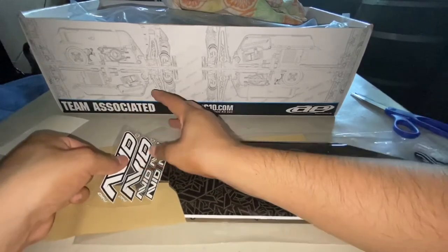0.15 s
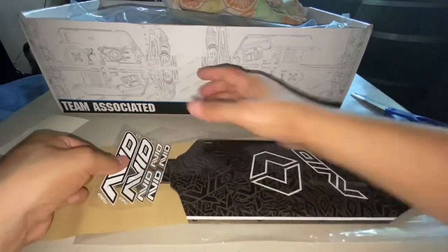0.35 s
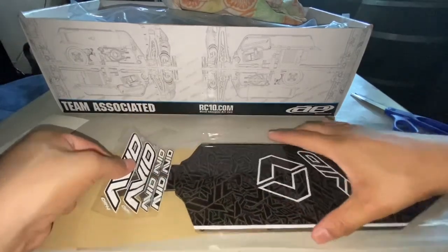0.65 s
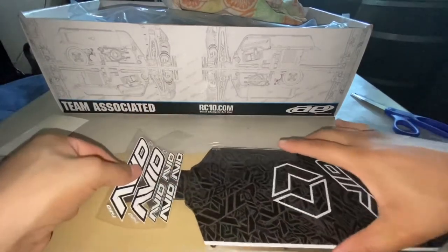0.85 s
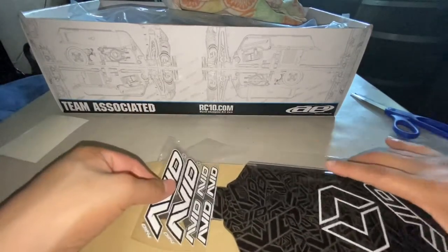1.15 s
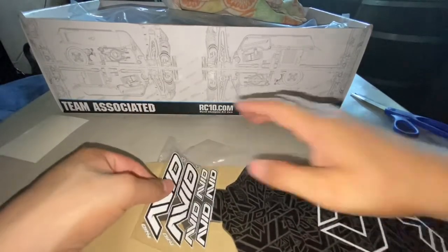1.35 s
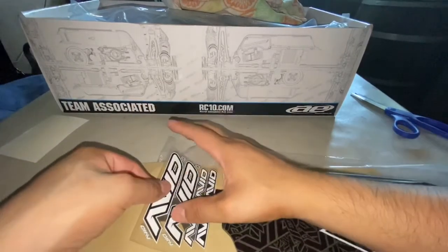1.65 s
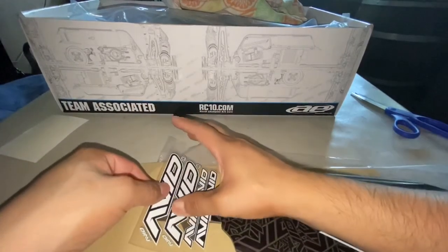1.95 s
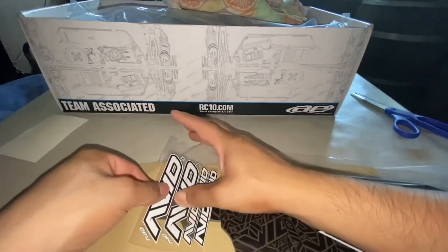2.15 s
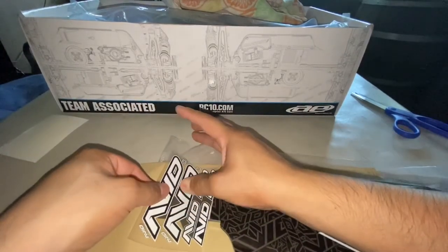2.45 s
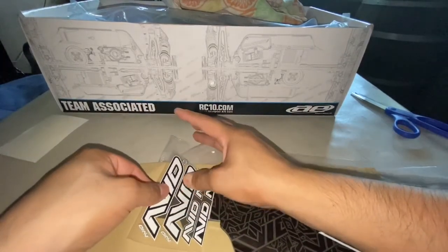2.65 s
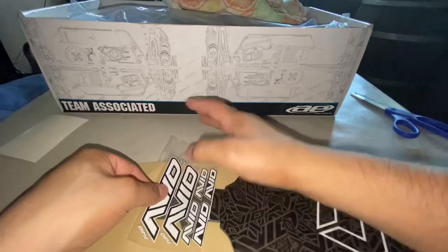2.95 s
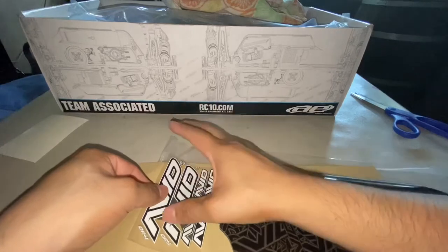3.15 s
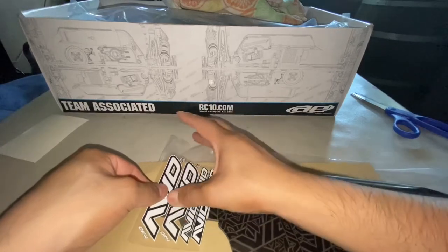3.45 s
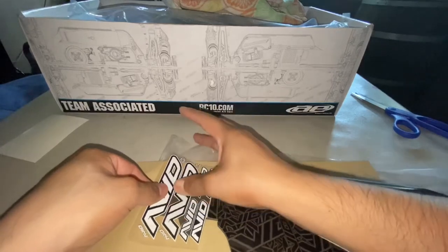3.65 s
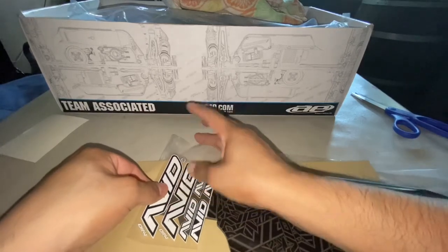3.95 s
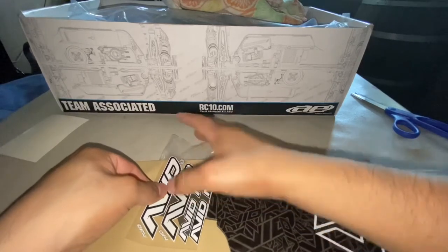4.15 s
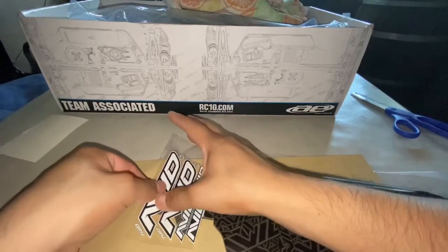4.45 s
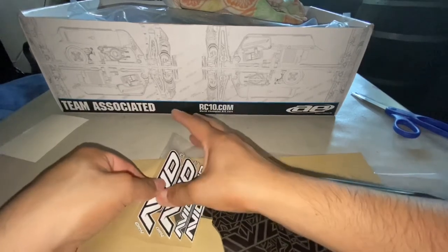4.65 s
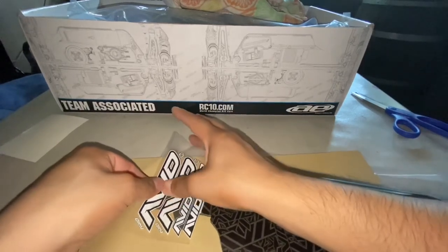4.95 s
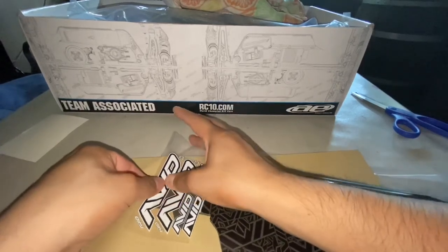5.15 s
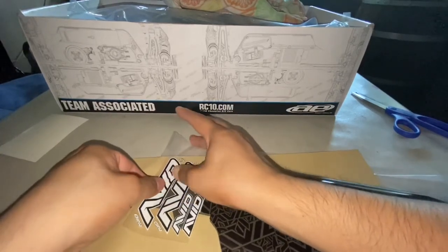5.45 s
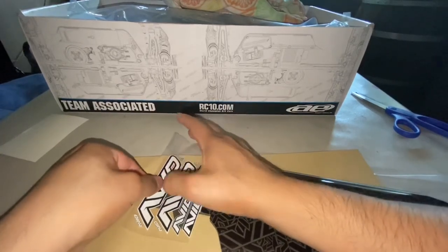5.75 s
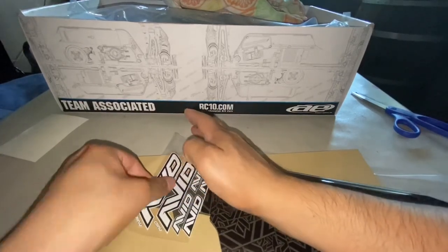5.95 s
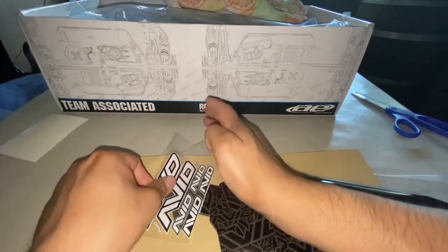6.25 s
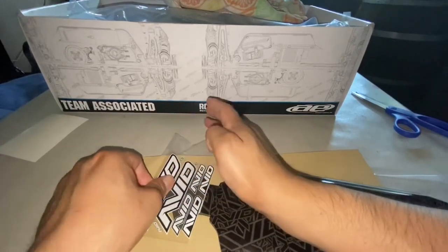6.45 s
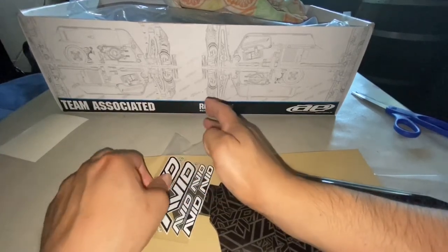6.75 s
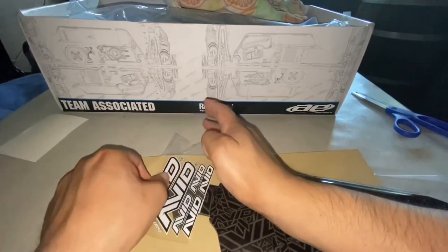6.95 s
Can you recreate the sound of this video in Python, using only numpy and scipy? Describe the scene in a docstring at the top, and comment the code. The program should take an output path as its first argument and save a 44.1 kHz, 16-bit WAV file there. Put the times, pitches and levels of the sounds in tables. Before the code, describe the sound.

Close, quiet handling of plastic film and backing paper: sliding, tiny clicks, sparse crackles, a strong mid-way table thud, low room hum.

```python
"""Hands press and slide a sheet of stickers over backing paper and a thin plate on a hollow table.
Film and paper crinkle: puffs of tiny snaps excite film, plate and sizzle responses; pressing mostly rings the plate.
Sliding is steadier snaps, squeaks and one bright snap are short noise bursts, dragging is noise through table modes.
The heel of a hand thumps the table (decaying sines); a machine hums and whines in the room (filtered noise, a sine).
A stereo microphone is close by."""
import sys
import numpy as np
from scipy import signal
from scipy.fft import rfft, irfft
from scipy.io import wavfile

SR = 44100
rng = np.random.default_rng(int(sys.argv[2]) if len(sys.argv) > 2 else 0)


def inscribe(sig):
    """Save sig as 16-bit PCM at rate SR to the path in sys.argv[1].

    A 1-D sig is mono; a 2-D sig holds one channel per row.
    Samples are clipped to [-1, 1] before scaling.
    """
    pcm = np.round(np.clip(np.atleast_2d(sig).T, -1, 1) * 32767)
    wavfile.write(sys.argv[1], SR, pcm.astype(np.int16))


def amplitude_ratio(level_db):
    """Convert a level in decibels to the matching linear amplitude (field) ratio."""
    exponent = np.asarray(level_db, float) / 20
    return 10 ** exponent


N = 313551

TIME_S = np.arange(N) / SR
GRID_HZ = np.maximum(np.arange(N // 2 + 1) * SR / N, 1)
PUFF_N = 16384   # samples in the window of one short event, peak in the middle
PUFF_LATE_S = (np.arange(PUFF_N) - PUFF_N // 2) / SR
PUFF_GRID_HZ = np.maximum(np.arange(PUFF_N // 2 + 1) * SR / PUFF_N, 1)
RISE_SHARE = 0.85   # rise time over fall time
SNAP_SPREAD_DB = 2.5
BOX_HZ = 240   # table modes above this belong to the box, the others to the top


def at_hz(points, hz=GRID_HZ):
    """Read a table on a log-frequency axis."""
    point_hz, value = np.transpose(points)
    return np.interp(np.log(hz), np.log(point_hz), value)


def noise():
    """Two unrelated white noises."""
    return rng.standard_normal((2, N))


def coloured(x, gain):
    """Filter by a gain per frequency and bring to rms 1."""
    y = irfft(rfft(x) * gain, N)
    return y / np.sqrt(np.mean(y ** 2))


def unit(gain):
    """Scale a response so that it keeps the power of white noise."""
    return gain / np.sqrt(np.mean(np.abs(gain) ** 2))


def resonance(hz, width_hz, grid_hz=GRID_HZ):
    """Response of one damped resonator, 1 at its peak."""
    return 1 / (1 + 1j * (grid_hz ** 2 - hz ** 2) / (grid_hz * width_hz))


def sides(left_over_right_db):
    """Left and right gains."""
    return amplitude_ratio(np.multiply.outer([0.5, -0.5], left_over_right_db))


def grains(per_s, spread_db):
    """Two unrelated trains of dense tiny snaps with uneven sizes."""
    born = rng.random((2, N)) < per_s / SR
    sizes = amplitude_ratio(spread_db * np.minimum(rng.exponential(1, (2, N)), 4))
    return born * sizes * noise()


def swell(late_s, fall_s, rise_share, point=2):
    """Envelope 1 at its peak, 1/e at fall_s; rises faster than it dies; a small point makes a sharp tip."""
    even_s = np.where(late_s < 0, late_s / rise_share, late_s)
    return np.exp(-np.abs(even_s / fall_s) ** point)


# share of the left sound in the right port: hz, share
PORT_LIKENESS = [(60, 0.96), (300, 0.64), (700, 0.66), (3000, 0.19), (9000, 0.25), (10600, 1),
                 (15000, 0.62)]
# phase by which the right port leads: hz, half_turns
PORT_LEAD = [(300, 0), (480, .45), (800, .8), (2000, .3), (4500, 0), (5800, 1), (8200, 3), (9300, 5),
             (10500, 6), (11800, 6), (12700, 7), (13900, 7), (14500, 8)]


def ports(pair):
    """Two microphone ports: the right hears the first sound with turned phase, mixed with the second sound."""
    alike = np.clip(at_hz(PORT_LIKENESS), 0, 1)
    first, second = rfft(pair)
    turned = first * np.exp(1j * np.pi * at_hz(PORT_LEAD))
    right = alike * turned + np.sqrt(1 - alike ** 2) * second
    return np.array([pair[0], irfft(right, N)])


# spectrum of the room air: hz, relative_db
ROOM_SPECTRUM = [(15, -12), (28, -18), (45, 0), (123, -5.5), (150, -10), (228, -13), (268, -14.5),
                 (324, -17.5), (556, -28), (728, -32.5), (1060, -35.5), (1210, -37.5), (1680, -66),
                 (5000, -49), (12000, -58), (14000, -56), (15800, -95)]
# hum lines of the machine: pitch_hz, level_db, width_hz (of each of two equal resonances)
HUM_LINES = [(58.36, -74, 3), (118.3, -65.5, 1.95), (170.8, -70, 3.9), (221.5, -73.5, 8.6)]


def room():
    """Steady air noise and the wavering lines of a distant machine, noise through narrow resonances."""
    out = amplitude_ratio(-60) * coloured(noise(), amplitude_ratio(at_hz(ROOM_SPECTRUM)))
    for pitch_hz, level_db, width_hz in HUM_LINES:
        out += amplitude_ratio(level_db) * coloured(noise(), resonance(pitch_hz, width_hz) ** 2)
    return out


def whine():
    """A faint tone from the machine's motor: a steady sine plus narrow noise that wavers in strength."""
    pitch_hz, waver_hz, steady_db, waver_db = 1180, 9, -92.94, -87.94
    steady = np.sqrt(2) * np.sin(2 * np.pi * pitch_hz * TIME_S + rng.uniform(0, 2 * np.pi))
    waver = coloured(noise(), resonance(pitch_hz, waver_hz))
    return amplitude_ratio(steady_db) * steady + amplitude_ratio(waver_db) * waver


# table modes, the first is the boom: pitch_hz, level_db, t60_s (at ring_share 1)
TABLE_MODES = [(61.4, -3, 0.28), (76.7, 3, 0.059), (99.4, 6, 0.082), (128.4, 2, 0.057), (160.8, -8, 0.098),
               (216, -10, 0.053), (270, -10, 0.11), (310.7, 1, 0.06), (340.5, -0.5, 0.068),
               (412.4, -6, 0.045), (447, -3.5, 0.057), (586, -8, 0.041), (748, -16.5, 0.086),
               (722, -13.5, 0.012)]
# hand on the table: start_s, level_db, boom_db, box_db (both relative), ring_share (scales the t60)
HAND_THUMPS = [(.005, -34, -6.5, -2.5, 1.03), (.238, -31, -12, -14, 2.2), (1.157, -25, -6, -7, 1.95),
               (2.68, -37, 5, -8, 0.71), (2.806, -44, -12, -12, 2.2), (2.821, -18.5, -7.5, -6, 1.25),
               (3.033, -45, 2, -7.5, 1.27), (3.887, -52, 20.5, 11.5, 0.41), (4.043, -29, -24, 15.5, 1.92),
               (4.059, -5.5, -8.5, -11.5, 0.71), (4.188, -31.5, -5, -5.5, 1.03),
               (4.279, -59.5, 23.5, -16, 0.76), (4.391, -41, 11.5, 2, 0.28), (5.468, -39, 4.5, -30, 0.39),
               (5.664, -30, -6, 0.5, 0.23), (6.526, -49, -10, 6.5, 1.02)]


def thumps():
    """Each table mode builds up over some ms, then dies; some thumps ring longer, some shorter."""
    build_s, top_pan_db = 0.0047, 4.5   # the table top sounds more to the left
    out = np.zeros((2, N + SR))
    t = np.arange(SR // 2) / SR
    growth = (1 - np.exp(-t / build_s)) ** 2
    for start_s, level_db, boom_db, box_db, ring_share in HAND_THUMPS:
        first = int(start_s * SR)
        for k, (pitch_hz, mode_db, t60_s) in enumerate(TABLE_MODES):
            share_db = boom_db if k == 0 else box_db if pitch_hz > BOX_HZ else 0
            decay_db = -60 * t / (t60_s * ring_share)
            envelope = growth * amplitude_ratio(level_db + share_db + mode_db + decay_db)
            phase = np.pi * at_hz(PORT_LEAD, pitch_hz) * np.array([[-0.5], [0.5]])   # at the two ports
            pan = sides(top_pan_db * (pitch_hz < BOX_HZ))[:, None]
            out[:, first:first + len(t)] += pan * envelope * np.sin(2 * np.pi * pitch_hz * t + phase)
    return out[:, :N]


# plate dragged over the table: peak_s, level_db, box_db (relative), fall_s
PLATE_DRAGS = [(0.21, -60, 0.5, 0.14), (0.337, -63, -15, 0.036), (0.476, -60, -20, 0.079),
               (0.588, -55, -0.5, 0.045), (0.772, -57.5, 1.5, 0.049), (0.897, -52.5, -2, 0.044),
               (0.965, -45.5, -21, 0.032), (1.09, -60.5, -25, 0.11), (2.832, -35.5, -7, 0.029),
               (3.315, -59.5, -5.5, 0.11), (4.043, -36.5, -9.5, 0.013), (4.067, -34.5, 3, 0.03),
               (5.914, -76, 7.5, 0.11), (6.226, -58.5, 2.5, 0.044), (6.362, -60, -3.5, 0.1)]


def drags():
    """Friction noise keeps the table modes rumbling while the plate slides; top and box are fed apart."""
    out = 0
    for box in (False, True):
        table = sum(amplitude_ratio(mode_db) * resonance(pitch_hz, 2.44 / t60_s) * (-1) ** k
                    for k, (pitch_hz, mode_db, t60_s) in enumerate(TABLE_MODES)
                    if (pitch_hz > BOX_HZ) == box)
        push = sum(amplitude_ratio(level_db + box * box_db) * swell(TIME_S - peak_s, fall_s, 0.94)
                   for peak_s, level_db, box_db, fall_s in PLATE_DRAGS)
        out = out + push * coloured(noise(), table)
    return out


# plate resonances: pitch_hz, width_hz, level_db
PLATE_MODES = [(452, 80, -3), (640, 120, -13), (883, 20, 3), (1020, 50, -4), (1290, 70, 0), (1710, 60, -10),
               (1980, 64, -7), (2470, 70, -14), (2930, 120, -21), (3300, 120, -19), (5350, 70, -22)]


def plate(grid_hz, uneven_db):
    """Sum of the plate's resonances, strengths scattered by uneven_db; neighbours swing opposite."""
    chance = rng.normal(0, 1, len(PLATE_MODES))
    return sum(amplitude_ratio(level_db + uneven_db * chance[k]) * resonance(pitch_hz, width_hz, grid_hz) * (-1) ** k
               for k, (pitch_hz, width_hz, level_db) in enumerate(PLATE_MODES))


# spectrum of the film, also for the crinkles: hz, relative_db
FILM_SPECTRUM = [(500, -70.5), (1100, 3.5), (2200, 4), (4000, -2), (7000, -4), (10000, -23), (14000, -57)]
# spectrum of the finest sizzle, also for the crinkles: hz, relative_db
SIZZLE_SPECTRUM = [(3500, -80.5), (5500, -14.5), (7500, -5), (9400, -5.5), (10600, -4), (12000, -6.5),
                   (13300, -8), (14800, -12), (15800, -7.5)]
# sheet sliding over the paper, course of the drive: time_s, drive_db
SHEET_RUBBING = [(0, -61.5), (.12, -95), (.24, -63), (.97, -62.5), (1.23, -78.5), (1.8, -82.5), (2, -75),
                 (2.2, -80.5), (3.1, -78.5), (3.4, -82.5), (4.47, -74), (4.9, -79.5), (5.13, -76),
                 (5.35, -81), (5.55, -70), (5.85, -81), (6.48, -82.5), (6.7, -76.5), (7.11, -78.5)]
# skin creeping slowly over the plate: peak_s, level_db, fall_s
SKIN_CREEPS = [(0.245, -62, 0.076), (0.55, -67, 0.057), (.79, -63.5, 0.076), (1.07, -70, 0.12),
               (1.895, -65, 0.078), (2.138, -68, 0.11), (2.866, -72, 0.061), (3.245, -64, .06),
               (3.388, -73, 0.029), (4.117, -67, 0.068), (4.467, -74, 0.16), (5.27, -65.5, 0.047),
               (5.904, -67.5, 0.11), (6.032, -64, 0.13), (6.353, -73, 0.089)]


def rubbing():
    """Sliding feeds film and sizzle with dense snaps; soft skin feeds mostly the plate's low modes, sparser."""
    drive = amplitude_ratio(np.interp(TIME_S, *np.transpose(SHEET_RUBBING)))
    film = amplitude_ratio(-7) * coloured(grains(9000, SNAP_SPREAD_DB), amplitude_ratio(at_hz(FILM_SPECTRUM)))
    sizzle = amplitude_ratio(-10.5) * coloured(grains(14000, 1.2), amplitude_ratio(at_hz(SIZZLE_SPECTRUM)))
    coarse_s = TIME_S[::SR // 1000]   # about 1 ms steps
    creep = sum(amplitude_ratio(level_db) * swell(coarse_s - peak_s, fall_s, RISE_SHARE)
                for peak_s, level_db, fall_s in SKIN_CREEPS)
    soft = 1 / (1 + (GRID_HZ / 1200) ** 2)
    hollow = coloured(grains(3000, 6.2), plate(GRID_HZ, uneven_db=0) * soft)
    return drive * (film + sizzle) + np.interp(TIME_S, coarse_s, creep) * hollow


# squeaks and one bright snap: peak_s, pitch_hz, level_db, fall_s, width_hz (of each of two equal resonances)
SQUEAK_BURSTS = [(0.452, 2097, -65, 0.016, 90), (0.533, 2016, -60, 0.049, 120),
                 (0.763, 1710, -54, 0.034, 500), (1.154, 2940, -62, .015, 120),
                 (2.756, 2000, -64, 0.038, 110), (3.3, 4730, -64.5, 0.018, 705),
                 (3.384, 886, -66.5, 0.025, 24.55), (4.013, 1980, -60, 0.035, 90),
                 (4.058, 2870, -39.5, 0.013, 300), (4.066, 2000, -42.5, 0.015, 200),
                 (4.478, 3510, -57, 0.019, 51), (6.225, 10300, -42.5, 0.0073, 2500),
                 (6.232, 3100, -53, 0.0091, 250), (6.227, 785, -50, 0.02, 70), (6.228, 428, -52, 0.015, 60)]


def squeaks():
    """Squeaks and one bright snap: short bursts around a pitch, noise twice through a resonance."""
    out = np.zeros((2, N + PUFF_N))
    for peak_s, pitch_hz, level_db, fall_s, width_hz in SQUEAK_BURSTS:
        first = int(peak_s * SR)
        response = unit(resonance(pitch_hz, width_hz, PUFF_GRID_HZ) ** 2)
        tone = irfft(rfft(rng.standard_normal((2, PUFF_N))) * response, PUFF_N)
        envelope = amplitude_ratio(level_db) * swell(PUFF_LATE_S, fall_s, 0.71, point=1.9)
        out[:, first:first + PUFF_N] += envelope * tone
    return out[:, PUFF_N // 2:PUFF_N // 2 + N]


# film crinkling: peak_s, film_db, pitch_hz, sizzle_over_film_db, fall_s
FILM_CRINKLES = [(0.075, -74, 4940, 5, 0.025), (0.151, -66.5, 3150, -3, 0.036),
                 (0.202, -62, 4900, 1.5, 0.029), (.33, -56.5, 3180, -6, 0.031),
                 (0.506, -70, 2800, -24, 0.016), (0.534, -57, 3140, -3.5, 0.03),
                 (0.585, -59.5, 3600, 2.5, 0.039), (.66, -60.5, 4670, 0.2, 0.016),
                 (0.754, -57, 2700, -28, 0.018), (0.837, -62, 3100, -6.5, 0.037),
                 (.915, -68.5, 4570, 6.5, 0.071), (1.153, -64.5, 2340, -6, 0.032),
                 (1.288, -59, 4350, -43, .013), (1.397, -68, 2220, -35, .017),
                 (2.304, -69.5, 4900, 13.5, 0.013), (2.692, -71.5, 3460, 2.5, 0.02),
                 (2.746, -62.5, 4080, 2.5, 0.016), (2.785, -60, 3830, -6, 0.024),
                 (2.819, -46, 3140, -7.5, 0.011), (2.857, -69, 2700, -17, 0.031),
                 (3.071, -70, 3700, -1, 0.019), (3.315, -63, 3400, -13, 0.0066),
                 (3.431, -72, 5800, -1.5, 0.015), (3.493, -80, 5200, -1.5, 0.031),
                 (3.899, -70, 4660, 4, 0.023), (4.021, -60, 3360, -4, .04),
                 (4.055, -44.5, 2930, -6.5, 0.016), (4.273, -71.5, 3580, 1.5, 0.013),
                 (4.327, -72.5, 4370, 0.7, 0.033), (4.383, -67.5, 4900, -1.5, .024),
                 (4.931, -83.5, 5200, 11, 0.026), (4.98, -77.5, 4970, 9, 0.013),
                 (5.032, -65, 5900, 3, .021), (5.246, -64.5, 5000, -10, 0.021),
                 (5.258, -48, 3670, -9, 0.0066), (5.317, -73, 4500, 0, 0.02),
                 (5.476, -43, 4300, -8.5, 0.021), (5.509, -48, 4170, -3.5, 0.018),
                 (5.616, -82.5, 4600, 14.5, .016), (5.678, -74, 3980, 6, 0.03),
                 (5.752, -72.5, 4040, -5, 0.026), (5.817, -56.5, 3800, -2, .019),
                 (6.188, -62, 3240, -2.5, 0.054), (6.224, -54, 3900, 3.5, .011),
                 (6.374, -59.5, 4240, -8, 0.013), (6.524, -66, 2880, -21, 0.012),
                 (6.556, -66, 4260, -4.5, 0.019), (6.682, -50, 4240, -18.5, 0.015),
                 (6.714, -62.5, 5300, 8, 0.014)]
# finger pressing the sheet onto the plate: peak_s, plate_db, fall_s
FINGER_PRESSES = [(-0.002, -56.5, 0.0079), (0.158, -57, 0.013), (0.231, -49, 0.017), (0.333, -57, 0.016),
                  (0.496, -59, 0.016), (0.605, -58.5, 0.017), (0.756, -49, 0.027), (0.835, -63, 0.03),
                  (1.007, -53, 0.016), (1.066, -60, 0.025), (1.152, -48, 0.016), (1.28, -67, 0.023),
                  (1.479, -64, 0.015), (1.809, -58, 0.022), (1.892, -54.5, .018), (1.94, -68, 0.03),
                  (2.039, -55.5, 0.021), (2.132, -57.5, 0.017), (2.302, -61.5, 0.0057), (2.369, -65, .019),
                  (2.741, -60.5, 0.015), (2.787, -65, 0.014), (2.82, -44.5, 0.014), (2.858, -59.5, 0.021),
                  (3.26, -63, 0.041), (3.309, -46.5, .011), (3.364, -57, 0.02), (3.571, -57.5, .021),
                  (3.774, -75.5, 0.013), (4.018, -65, 0.032), (4.06, -41.5, 0.019), (4.277, -60.5, 0.0092),
                  (4.423, -62.5, 0.016), (4.539, -58.5, 0.014), (4.715, -68, 0.01), (5.263, -54.5, 0.0094),
                  (5.823, -53.5, 0.0082), (5.85, -62, 0.012), (5.969, -61, 0.007), (6.016, -54.5, 0.014),
                  (6.168, -56.5, 0.02), (6.229, -48, 0.0075), (6.247, -61, .02), (6.338, -59, .013),
                  (6.38, -60, 0.017), (6.438, -60.5, 0.0093), (6.529, -58.5, 0.011)]


def film_response(pitch_hz):
    """The sheet resonates broadly around its pitch, four small panels between creases more narrowly."""
    crease_width_share, crease_spread_octaves = 0.14, 0.3
    panels_hz = pitch_hz * 2 ** rng.normal(0, crease_spread_octaves, size=4)
    creases = sum(resonance(hz, hz * crease_width_share, PUFF_GRID_HZ) for hz in panels_hz)
    sheet = resonance(pitch_hz, 0.93 * pitch_hz, PUFF_GRID_HZ)
    return unit(amplitude_ratio(at_hz(FILM_SPECTRUM, PUFF_GRID_HZ)) * (sheet + 0.56 * creases))


def crinkles():
    """Puffs of snaps shake the film, the plate below and the finest sizzle; a press mostly the plate."""
    plate_under_film_db, plate_uneven_db = -17.5, 3
    film_under_finger_db, pinned_hz = -21, 2220   # pinned film rattles weakly and low
    snaps = grains(7000, SNAP_SPREAD_DB)
    snaps = np.pad(snaps / np.std(snaps), [(0, 0), (PUFF_N, PUFF_N)], "wrap")
    sizzle_response = unit(amplitude_ratio(at_hz(SIZZLE_SPECTRUM, PUFF_GRID_HZ)))
    puffs = [(peak_s, film_db, pitch_hz, film_db + plate_under_film_db, amplitude_ratio(film_db + sizzle_db), fall_s)
             for peak_s, film_db, pitch_hz, sizzle_db, fall_s in FILM_CRINKLES]
    puffs += [(peak_s, plate_db + film_under_finger_db, pinned_hz, plate_db, 0, fall_s)
              for peak_s, plate_db, fall_s in FINGER_PRESSES]
    out = np.zeros_like(snaps)
    for peak_s, film_db, pitch_hz, plate_db, sizzle_gain, fall_s in puffs:
        first = int(peak_s * SR) + PUFF_N // 2
        near = slice(first, first + PUFF_N)
        body = amplitude_ratio(film_db) * film_response(pitch_hz)
        body = body + amplitude_ratio(plate_db) * unit(plate(PUFF_GRID_HZ, plate_uneven_db))
        body = body + sizzle_gain * sizzle_response
        puff = snaps[:, near] * swell(PUFF_LATE_S, fall_s, RISE_SHARE, point=1.39)
        out[:, near] += irfft(rfft(puff) * body, PUFF_N)
    return out[:, PUFF_N:-PUFF_N]


# balance of the hands, mostly to the left: hz, left_over_right_db
HANDS_BALANCE = [(100, 2), (300, 3), (1000, 4), (2000, 0.5), (4000, 7), (8000, 2), (12000, -3)]


def scene():
    """Room, table and hands summed at the two ports."""
    background = ports(room() + whine()) * sides(6)[:, None]
    hands = ports(drags() + rubbing() + squeaks() + crinkles())
    hands = irfft(rfft(hands) * sides(at_hz(HANDS_BALANCE)), N)
    return background + thumps() + hands


def top_cut(x):
    """Nothing passes above the cut-off."""
    return signal.sosfilt(signal.butter(12, 15900, fs=SR, output="sos"), x)


def record(dry):
    """The microphone drops the deepest rumble."""
    rumble_cut = signal.butter(4, 39.3, "high", fs=SR, output="sos")
    mix = signal.sosfilt(rumble_cut, dry)
    return top_cut(mix)


dry = scene()
out = record(dry)
inscribe(out)
```